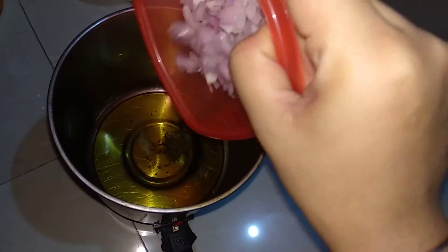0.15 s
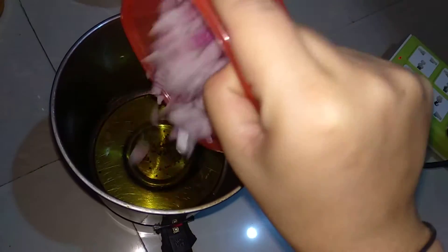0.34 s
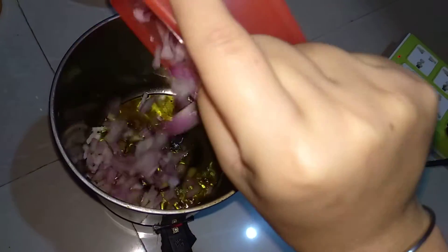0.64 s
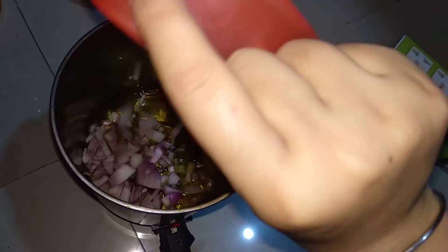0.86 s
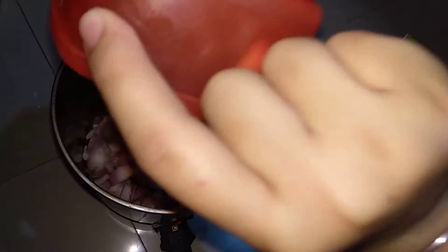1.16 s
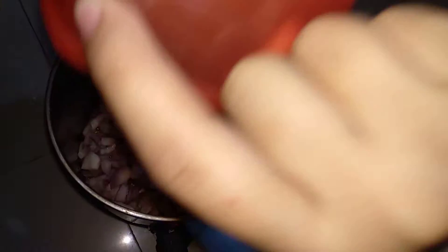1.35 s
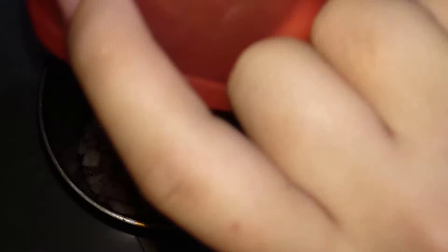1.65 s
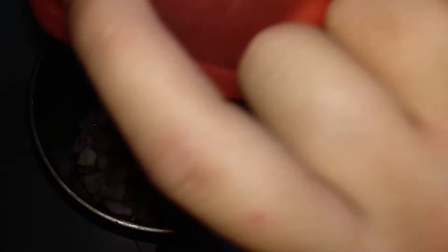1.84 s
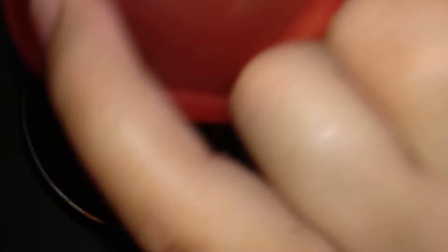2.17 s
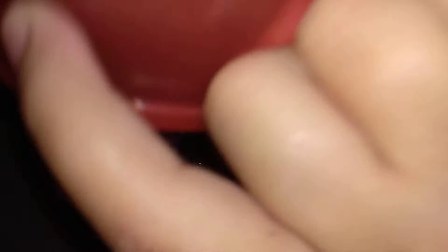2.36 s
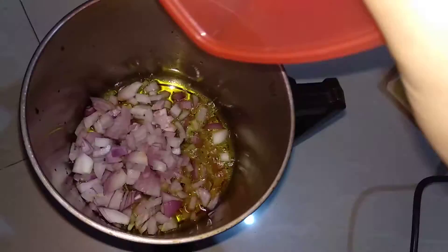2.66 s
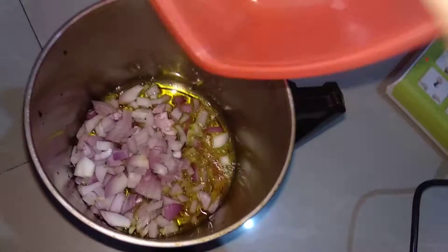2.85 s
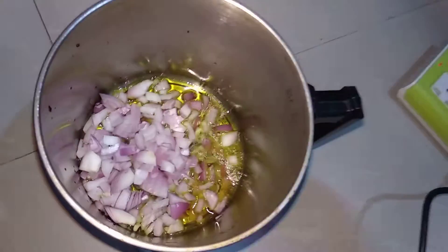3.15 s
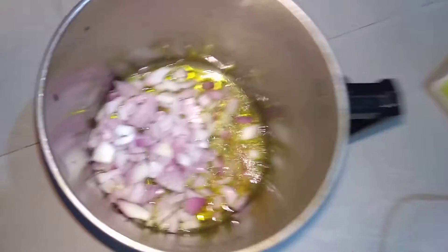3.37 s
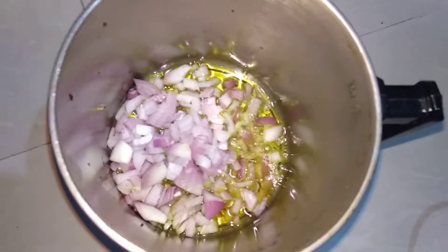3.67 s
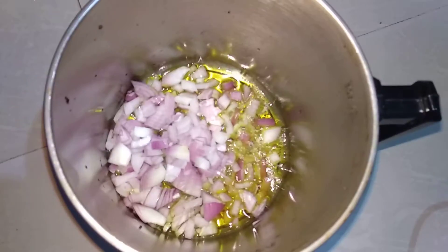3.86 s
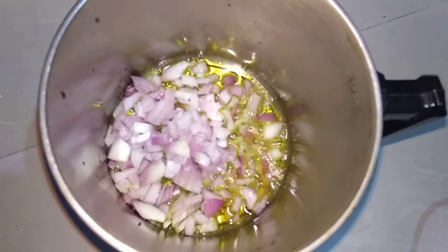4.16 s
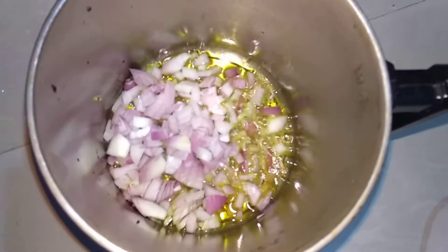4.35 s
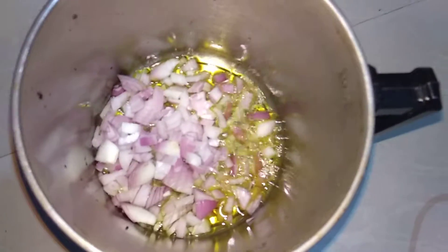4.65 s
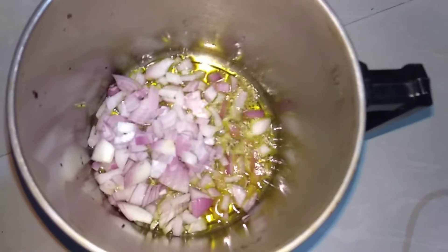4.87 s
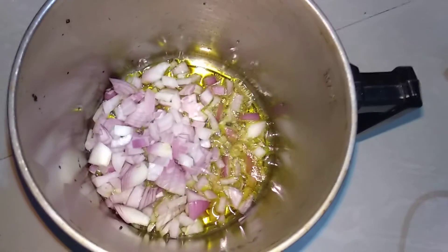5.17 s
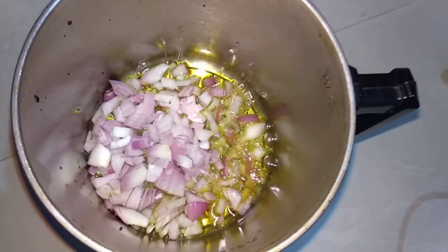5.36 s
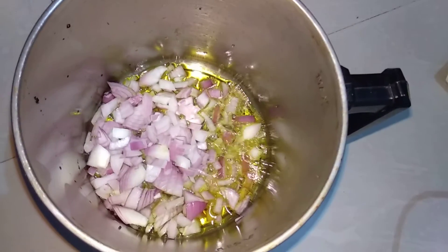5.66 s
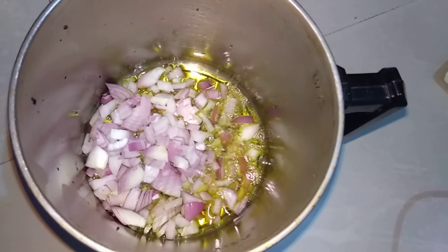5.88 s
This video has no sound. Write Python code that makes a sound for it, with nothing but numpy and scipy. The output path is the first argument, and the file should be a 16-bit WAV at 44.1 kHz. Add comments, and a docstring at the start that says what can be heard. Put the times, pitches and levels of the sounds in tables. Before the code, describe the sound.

Chopped onions patter into hot oil in a steel pot, sizzling up in a surge, then frying steadily with crackles and one sharp pop.

```python
"""Onions into hot oil

Chopped onions slide from a plastic bowl into hot oil in a steel pot, close to a hand-held camera.
They patter, spit in a surge and sizzle steadily (random grains); water drops burst (short resonances).
The bowl is tapped and put down (struck modes); pot air modes and kitchen echoes answer.
Beneath lie a low rumble and a drone (shaped noise) and, later, a faint hum (a wavering sine)."""
import sys
import numpy as np
from scipy import signal
from scipy.fft import rfft, irfft, next_fast_len
from scipy.io import wavfile
from scipy.ndimage import map_coordinates

SR = 44100
rng = np.random.default_rng(int(sys.argv[2]) if len(sys.argv) > 2 else 0)


def wav_record(signal):
    """Record a signal, one row per channel, as 16-bit PCM in the file named by sys.argv[1]."""
    frames = np.transpose(np.atleast_2d(signal))
    bounded = np.clip(frames, -1, 1)
    # unit amplitude maps onto the largest positive 16-bit level
    quanta = np.round(bounded * 32767).astype(np.int16)
    wavfile.write(sys.argv[1], SR, quanta)


N = 265261
RING = SR // 3  # samples in one short sound with its echoes
HZ = np.fft.rfftfreq(RING, 1 / SR)
TOP_HZ = 15950  # band limit of the camera
STRIKE_LAG_S = 0.001  # from blow to camera


def amp(db):
    """Decibels to gain."""
    return 10 ** (np.asarray(db) / 20)


def unit(x):
    """x at rms 1."""
    return x / np.sqrt(np.mean(x ** 2) + 1e-20)


def along(points, hz):
    """(Hz, value) points read on a log frequency axis."""
    point_hz, value = np.transpose(points)
    return np.interp(np.log(hz + 1), np.log(point_hz + 1), value)


def filtered(x, response):
    """x times a response of frequency, zero-padded."""
    n = x.shape[-1]
    padded = next_fast_len(n + SR // 10)
    spectrum = rfft(x, padded) * response(np.fft.rfftfreq(padded, 1 / SR))
    return irfft(spectrum, padded)[..., :n]


def coloured(x, spectrum):
    """x shaped by a spectrum, at rms 1."""
    return unit(filtered(x, lambda hz: amp(along(spectrum, hz))))


def delay(seconds):
    """Response of a path that takes this long."""
    return np.exp(-2j * np.pi * HZ * seconds)


def resonances(modes, detune=1):
    """Summed causal band-pass response of (Hz, width Hz, dB) modes, pitches times detune."""
    total = 0
    for hz, width_hz, db in modes:
        damping = 1j * HZ * width_hz
        total = total + amp(db) * damping / ((hz * detune) ** 2 - HZ * HZ + damping)
    return total


def struck(response):
    """Spectrum of a ring of peak 1, delayed by STRIKE_LAG_S and band-limited."""
    ring = response * delay(STRIKE_LAG_S) / (1 + (HZ / TOP_HZ) ** 20)
    return ring / np.abs(irfft(ring)).max()


def add(track, start_s, sound):
    """Mix a stereo sound in at start_s."""
    part = track[:, round(start_s * SR):][:, :sound.shape[1]]
    part += sound[:, :part.shape[1]]


def panned(level_db, left_right_db):
    """Left and right gains, the difference split evenly."""
    return amp(level_db + left_right_db * np.array([[.5], [-.5]]))


def swell(start_s, attack_s, hold_s, fade_s):
    """Gain that rises, holds until hold_s after the start and dies away."""
    t = np.arange(N) / SR - start_s
    return np.clip(t / attack_s, 0, 1) * np.exp(-np.maximum(t - hold_s, 0) / fade_s)


def wobble(knots_per_s):
    """Smooth random curve."""
    knots = rng.standard_normal(int(N * knots_per_s / SR) + 4)
    return map_coordinates(knots, [np.arange(N) * knots_per_s / SR])


def echoes(t60):
    """Response of a fresh diffuse tail of energy 1 per port, decaying 60 dB in t60 seconds."""
    t = np.arange(RING) / SR
    tail = rng.standard_normal((2, RING)) * amp(-60 * t / t60) * (t > .0004)
    return rfft(tail / np.linalg.norm(tail, axis=1, keepdims=True))


# pot air modes, in phase at both ports: pitch_hz, width_hz, level_db
UPRIGHT_MODES = [(562.7, 41.5, 21.5), (2490, 190, -1), (5850, 130, -20), (10500, 1100, -13.5)]
# air modes across the pot, opposite in sign at the ports: pitch_hz, width_hz, level_db
CROSS_MODES = [(1175, 60, -2), (1797, 153, 11), (4780, 190, 2)]
# left port faces away from the pot: freq_hz, left_right_db
LEFT_SHADE = [(400, -2), (1300, -9), (2400, -10), (4400, -3.5), (6500, -4), (8100, -4.5), (11000, -17),
              (15000, -11)]
MODE_SCATTER = 0.014  # relative sd of mode pitch between spots of the heap


def from_pot(ring, wall_db, room_db, wall_t60=0.031, room_t60=0.11):
    """A short sound leaves the pot: direct, off the steel wall, through the air modes, round the kitchen."""
    left_lag_s = 0.000254 + .00005 * rng.standard_normal()  # varies with the spot
    detune = 1 + MODE_SCATTER * rng.standard_normal()
    upright = resonances(UPRIGHT_MODES, detune)
    across = resonances(CROSS_MODES, detune)
    direct = np.array([delay(left_lag_s) - across, 1 + across])
    near = direct + upright + amp(wall_db) * echoes(wall_t60)
    far = amp(room_db) * echoes(room_t60) * (1 + upright + across)
    shade_db = np.outer([1, 0], along(LEFT_SHADE, HZ))
    # room sound comes from all sides: a tenth of the shading in dB
    return irfft(ring * (near * amp(shade_db) + far * amp(0.1 * shade_db)))


def grains(per_second, spread_db, flurry_db):
    """Impulses at random moments, loudness varying in short flurries: many weak, a few strong."""
    place, size, sign = rng.random((round(per_second * N / SR), 3)).T
    flurries = rng.standard_normal(N * 60 // SR)
    db = spread_db * np.minimum(-np.log(1 - size), 5)
    db = db + flurry_db * np.interp(place, np.linspace(0, 1, len(flurries)), flurries)
    return np.bincount((place * N).astype(int), amp(db) * np.sign(sign - .5), N)


def crackle(spectrum, pitches_hz, per_second, spread_db, flurry_db, room_db, wall_db, sharpness_q=2):
    """Grains from several spots in the pot, each with its own pitch, path and flurries; rms 1."""
    out = np.zeros((2, N))
    for hz in pitches_hz:
        ring = resonances([(hz, hz / sharpness_q, 0)])
        burst = amp(along(spectrum, HZ)) * ring * delay(STRIKE_LAG_S)
        path = from_pot(burst, wall_db, room_db)
        hits = grains(per_second / len(pitches_hz), spread_db, flurry_db)
        out += signal.oaconvolve(hits[None], path, axes=1)[:, :N]
    return unit(out)


# hand rumble, relative spectrum: freq_hz, level_db
RUMBLE_SPECTRUM = [(8, -49), (21, -13), (27, 3.5), (33, -14), (43, -5), (65, -23.5), (95, -30),
                   (300, -51.5)]
# room drone, relative spectrum: freq_hz, level_db
DRONE_SPECTRUM = [(25, -45), (50, 5.5), (70, 10), (92, -8), (112, 0.5), (150, -6), (200, -12.5), (262, -5),
                  (320, -18), (430, -13.5), (700, -22), (1200, -26.5), (4000, -43), (16000, -42)]
# drone level, interpolated: time_s, level_db
DRONE_COURSE = [(0.2, -60.5), (0.7, -65.5), (1.65, -66.5), (2.1, -60), (2.7, -62.5), (6.0, -63)]
# hand moves the camera: start_s, hold_s, level_db
HAND_MOVES = [(0.093, 0.073, -58.5), (3.105, 0.98, -56.5), (3.374, 0.33, -57.5), (4.85, 0.46, -58)]
MOVE_ATTACK_S, MOVE_FADE_S = 0.14, 0.13
HOLD_DB, TREMOR_DB = -65.5, -0.5  # rumble of the still hand; gain on its random wobble


def background():
    """The hand rumbles on the camera, more when it moves; the kitchen drones, near mono in the bass."""
    tremor = wobble(6)
    moving = sum(amp(db) * swell(start_s, MOVE_ATTACK_S, hold_s, MOVE_FADE_S)
                 for start_s, hold_s, db in HAND_MOVES)
    hand = np.hypot(amp(HOLD_DB + TREMOR_DB * tremor), moving)
    rumble = coloured(rng.standard_normal(N), RUMBLE_SPECTRUM)
    apart = [(50, -16.0), (130, -16), (280, -10.5), (600, -4.5), (1200, 5.0)]  # freq_hz, side_mid_db
    side = filtered(rng.standard_normal(N), lambda hz: amp(along(apart, hz)))
    mid = rng.standard_normal(N)
    drone = coloured(mid + np.array([side, -side]), DRONE_SPECTRUM)
    drone_db = np.interp(np.arange(N) / SR, *np.transpose(DRONE_COURSE))
    return hand * rumble + amp(drone_db) * drone


# onion loads sliding onto the pot's bottom: start_s, hold_s, patter_db
ONION_LOADS = [(0.342, 0.036, -65.5), (0.447, 0.15, -64.5), (0.83, 0.032, -65.5), (1.056, 0.11, -68.5)]
LOAD_ATTACK_S, LOAD_FADE_S = 0.026, 0.036
FIRST_PIECE_S, LANDING_S = 0.28, 0.473  # first piece touches the oil; the heap follows
SURGE_ATTACK_S = 0.016  # wet surfaces flash to steam at once
LAST_HOLD_S, LAST_FADE_S = 0.12, 0.41  # last load spits anew
FITS_DB, FLUTTER_DB = 3, 1.5  # gains on random wobble: surges, steady frying


def frying(oil_db, first_db, surge_db, hold_s, fade_s, last_db, steady_db, growth_db_per_s):
    """Steam strength: surface water boils off in a fitful surge, then frying steadily grows as it heats."""
    t = np.arange(N) / SR
    fits = wobble(22)
    first = amp(first_db) * np.clip((t - FIRST_PIECE_S) / 0.11, 0, 1)
    surge = amp(surge_db + FITS_DB * fits) * swell(LANDING_S, SURGE_ATTACK_S, hold_s, fade_s)
    last_swell = swell(ONION_LOADS[-1][0], LOAD_ATTACK_S, LAST_HOLD_S, LAST_FADE_S)
    last = amp(last_db + FITS_DB * fits) * last_swell
    rising_db = steady_db + growth_db_per_s * (t - LANDING_S)
    steady = amp(rising_db + FLUTTER_DB * fits) * (t > LANDING_S)
    return np.sqrt(amp(oil_db) ** 2 + first ** 2 + surge ** 2 + last ** 2 + steady ** 2)


# fine steam fizz, relative spectrum: freq_hz, level_db
FIZZ_SPECTRUM = [(300, -25), (1500, -45), (4200, -16), (5300, -4.5), (7000, -5.5), (9000, 0), (10500, 2),
                 (13000, -2.5), (15500, -4.5), (16500, -19)]
# coarser spatter, relative spectrum: freq_hz, level_db
SPATTER_SPECTRUM = [(200, -49), (600, 0.5), (1300, -9), (2400, -1.5), (3800, -0.5), (5500, -5.5),
                    (9000, -23), (16000, -59)]
# fizz strength: oil_db, first_db, surge_db, hold_s, fade_s, last_db, steady_db, growth_db_per_s
FIZZ_STEAM = dict(oil_db=-79, first_db=-67.5, surge_db=-49, hold_s=0.21, fade_s=0.17, last_db=-66, steady_db=-57.5, growth_db_per_s=0.78)
# spatter strength: oil_db, first_db, surge_db, hold_s, fade_s, last_db, steady_db, growth_db_per_s
SPATTER_STEAM = dict(oil_db=-104, first_db=-75.5, surge_db=-60, hold_s=0.18, fade_s=0.25, last_db=-64, steady_db=-71.5, growth_db_per_s=1.49)


def sizzle():
    """Steam escapes in many tiny bursts: fine fizz over coarser spatter, stray ticks on top."""
    fine_hz = np.geomspace(5000, 14500, 8)
    coarse_hz = np.geomspace(900, 5500, 7)
    fizz = crackle(FIZZ_SPECTRUM, fine_hz, per_second=4200, spread_db=3.5, flurry_db=1.7,
                   room_db=-4, wall_db=1.5)
    spatter = crackle(SPATTER_SPECTRUM, coarse_hz, per_second=2200, spread_db=2.5, flurry_db=3.0,
                      room_db=1, wall_db=5.0)
    # surface bubbles face the camera: broad clicks, drier
    ticks = crackle(FIZZ_SPECTRUM, [5000, 9000, 13000], per_second=190, spread_db=2.6, flurry_db=1.2,
                    room_db=-14, wall_db=-10, sharpness_q=0.7)
    fine = frying(**FIZZ_STEAM) * (fizz + amp(-8.0) * ticks)
    return fine + frying(**SPATTER_STEAM) * spatter


# loudest bursting water drops: start_s, relative level_db, pitch_hz
WATER_POPS = [(0.116, -24, 10500), (0.3, -25, 13000), (0.459, -32, 11000), (0.4818, -35, 11100),
              (0.5086, -30, 11300), (0.5377, -27, 10300), (0.593, -36, 9200), (0.6349, -30, 10300),
              (0.7067, -36, 10500), (0.7205, -24.5, 6300), (0.7834, -33, 9900), (0.817, -38, 10500),
              (0.8494, -31, 11300), (0.9366, -30.5, 12100), (1.2329, -37, 8200), (1.247, -26, 10500),
              (1.3178, -38, 11100), (1.3522, -34, 11800), (1.4, -30, 13000), (1.4949, -49, 8850),
              (1.5147, -35, 9500), (1.524, -18, 8550), (1.6178, -31, 10500), (1.7326, -25, 9900),
              (1.742, -36, 10500), (1.7708, -27, 11100), (1.8124, -32, 13500), (1.9111, -29.5, 10300),
              (2.1361, -14.5, 15000), (2.2702, -29, 10500), (2.499, -33, 11200), (2.577, -33.5, 8650),
              (2.709, -27.5, 12000), (2.925, -35, 10700), (3.092, -22.5, 12800), (3.1519, -22, 12300),
              (3.5566, -28.5, 9050), (3.7946, -26, 9900), (3.916, -30, 11200), (4.151, -25, 9000),
              (4.156, -3.5, 9270), (4.2624, -31, 9800), (4.295, -31.5, 10700), (4.4957, -31.5, 5700),
              (4.544, -36, 10500), (4.7004, -17.5, 10000), (5.0267, -17, 10260), (5.0929, -25, 10400),
              (5.162, -23.5, 9500), (5.232, -24.5, 10900), (5.358, -31.5, 9900), (5.4506, -31, 11300),
              (5.5433, -32.5, 8350), (5.8982, -19.5, 9260)]
POP_Q, POP_Q_PER_S = 1.46, 0.99  # snaps ring longer as frying goes on


def pops():
    """A water drop flashes to steam: a dry snap of a few cycles, then pot and, faintly, room."""
    out = np.zeros((2, N))
    for start_s, db, hz in WATER_POPS:
        sharpness_q = POP_Q + POP_Q_PER_S * start_s
        snap = struck(resonances([(hz, hz / sharpness_q, 0)]))
        heard = from_pot(snap, wall_db=-3, room_db=-10.5, wall_t60=0.011, room_t60=0.15)
        add(out, start_s, amp(db + 0.5) * heard)
    return out


# dull taps on the held bowl: start_s, level_db, pitch_hz, sharpness_q, click_db, left_right_db
BOWL_TAPS = [(0.147, -44, 875, 5.2, -22, -8), (0.1627, -45, 940, 2.6, -7, -9),
             (0.1775, -62, 950, 3.5, -12, 1), (0.2221, -49.5, 830, 2.3, -11, -13.5)]
TAP_CLICK_HZ, TAP_CLICK_WIDTH_HZ = 2360, 440


def taps():
    """The hand damps the bowl: each tap is a few dull cycles and a small click, with a room tail."""
    out = np.zeros((2, N))
    for start_s, db, hz, sharpness_q, click_db, left_right_db in BOWL_TAPS:
        body = resonances([(hz, hz / sharpness_q, 0)]) / (1 + .5j * HZ / hz) ** 2
        click = resonances([(TAP_CLICK_HZ, TAP_CLICK_WIDTH_HZ, 0)]) ** 2
        tap = struck(body + amp(click_db) * click)
        heard = irfft(tap * (1 + amp(-5) * echoes(t60=0.14)))
        add(out, start_s - STRIKE_LAG_S, panned(db, left_right_db) * heard)
    return out


# onion patter, relative spectrum: freq_hz, level_db
PATTER_SPECTRUM = [(120, -13), (400, 7), (560, -12.5), (720, -22), (1250, 4.5), (1700, -33), (6000, -49)]


def tumble():
    """Soft pieces patter onto the bottom as the bowl is tipped, sounding the pot's lowest air mode."""
    flow = sum(amp(db) * swell(start_s, LOAD_ATTACK_S, hold_s, LOAD_FADE_S)
               for start_s, hold_s, db in ONION_LOADS)
    return flow * crackle(PATTER_SPECTRUM, [560, 580, 1200], per_second=540, spread_db=5.0, flurry_db=1,
                          room_db=-1.5, wall_db=-4)


# wet clumps, big bubbles, small ticks: start_s, level_db, pitch_hz, sharpness_q
WET_PLOPS = [(0.473, -52.5, 2184, 47), (0.6066, -38.5, 5330, 7.9), (0.676, -44, 4100, 5),
             (0.707, -29, 2370, 8.9), (0.877, -60, 1910, 8), (0.972, -56.5, 2550, 9),
             (1.018, -54.5, 1910, 4.3), (1.248, -55, 2450, 14), (1.2504, -44, 4750, 7.2),
             (1.813, -44, 3500, 0.34), (2.315, -45.5, 4000, 1.4), (2.431, -52, 4300, 3),
             (2.675, -52, 4340, 6.1), (2.8733, -34, 2170, 0.64), (3.0103, -46, 3000, 1),
             (3.101, -46.5, 2360, 2), (3.7943, -39.5, 2400, 1), (3.9638, -46, 3000, 5.6),
             (4.244, -43, 2740, 1.8), (4.262, -41, 3900, 3.3)]


def plops():
    """Wet clumps and big bubbles ring at mostly lower pitches than the pops; dry ticks barely ring."""
    out = np.zeros((2, N))
    for start_s, db, hz, sharpness_q in WET_PLOPS:
        plop = struck(resonances([(hz, hz / sharpness_q, 0)]))
        add(out, start_s, amp(db) * from_pot(plop, wall_db=6, room_db=2.0))
    return out


# wet clumps hit the oil and spit: start_s, hold_s, level_db
CLUMP_SPUTTERS = [(0.486, 0.041, -48.5), (0.54, 0.02, -52), (0.591, 0.037, -48), (0.699, 0.04, -48),
                  (0.76, 0.024, -46), (0.804, 0.0078, -58), (0.875, 0.01, -53), (0.934, 0.013, -62),
                  (1.114, 0.042, -57.5), (1.188, 0.067, -53), (1.373, 0.022, -54.5)]
SPUTTER_ATTACK_S, SPUTTER_FADE_S = 0.0043, 0.02


def sputter():
    """Each wet clump spits a short, dry cluster of crackles, with coarser splatters beneath."""
    spitting = sum(amp(db) * swell(start_s, SPUTTER_ATTACK_S, hold_s, SPUTTER_FADE_S)
                   for start_s, hold_s, db in CLUMP_SPUTTERS)
    spits = crackle(FIZZ_SPECTRUM, [5500, 8500, 10500, 13000], per_second=800, spread_db=2.6,
                    flurry_db=2.2, room_db=-8, wall_db=-3, sharpness_q=1)
    splatters = crackle(SPATTER_SPECTRUM, [2400, 3600, 5000], per_second=450, spread_db=2,
                        flurry_db=1.5, room_db=-8, wall_db=-2)
    return spitting * (spits + amp(-11.5) * splatters)


# single onion pieces drop into the pot: start_s, level_db, pitch_hz, sharpness_q
ONION_PIECES = [(0.487, -62.5, 545, 1.8), (0.512, -58.5, 554, 1.4), (0.556, -63, 566, 1.3),
                (0.603, -66, 525, 1.3), (0.7075, -53.5, 810, 1.3), (0.841, -59, 1190, 4),
                (0.872, -65.5, 560, 1.8), (1.0705, -46.5, 1205, 15), (1.119, -53, 1260, 9),
                (1.136, -65, 555, 1), (1.184, -52, 1190, 7.8), (1.345, -59, 1140, 13),
                (1.385, -62, 1130, 9.6)]


def pieces():
    """Soft pieces land one by one: a short plock each, low-passed, coloured by the pot."""
    out = np.zeros((2, N))
    for start_s, db, hz, sharpness_q in ONION_PIECES:
        plock = struck(resonances([(hz, hz / sharpness_q, 0)]) / (1 + 1j * HZ / hz))
        add(out, start_s, amp(db) * from_pot(plock, wall_db=-4, room_db=-4))
    return out


HUM_START_S, HUM_ATTACK_S, HUM_HZ, HUM_DB = 3.03, 0.27, 109.2, -73
HUM_DRIFT, HUM_WAVER_DB = 0.0387, 5  # gains on random wobble: share of pitch, level


def hum():
    """A faint low sine comes in, wavering in pitch and level."""
    pitch_hz = HUM_HZ * (1 + HUM_DRIFT * wobble(15))
    phase = 2 * np.pi * np.cumsum(pitch_hz) / SR
    rise = np.clip((np.arange(N) / SR - HUM_START_S) / HUM_ATTACK_S, 0, 1)
    return amp(HUM_DB + HUM_WAVER_DB * wobble(6.3)) * rise * unit(np.sin(phase))


# bowl put down: start_s, level_db, brightness_limit_hz, left_right_db, ring_db, first_bounce_s
BOWL_KNOCKS = [(3.7045, -32, 4480, 4, -1, 0.00113), (3.8803, -30, 4940, 3.5, 0, 0.0016)]
# bowl wall modes: pitch_hz, width_hz, level_db
BOWL_MODES = [(398, 48, 6.5), (485, 83, 2.5), (782, 96, 4), (1150, 110, -6), (1310, 110, -3), (1408, 27, 7),
              (1720, 110, 2), (2650, 240, 0.5), (4020, 500, -8), (6400, 1000, 1)]
CLACK_HZ, CLACK_WIDTH_HZ, CLACK_DB = 1000, 1500, -8.5  # broad, dead contact
RIM_SHRINK, RIM_LOSS_DB = 0.712, 2  # per rim bounce: flight time ratio, contact loss


def bowl():
    """The empty bowl is put down in two clacks: rim chatters, walls ring briefly, room answers."""
    out = np.zeros((2, N))
    for start_s, db, limit_hz, left_right_db, ring_db, bounce_s in BOWL_KNOCKS:
        chatter = 0
        for k in range(5):
            contact_s = bounce_s * sum(RIM_SHRINK ** np.arange(k))
            chatter = chatter + amp(-RIM_LOSS_DB * k) * delay(contact_s)
        clack = resonances([(CLACK_HZ, CLACK_WIDTH_HZ, CLACK_DB)])
        body = amp(ring_db) * resonances(BOWL_MODES) + clack
        knock = struck(body / (1 + 1.4j * HZ / limit_hz - (HZ / limit_hz) ** 2) ** 2)
        room = amp(1.5) * echoes(t60=0.036) + amp(3.5) * echoes(t60=0.19)
        heard = irfft(knock * (chatter + room))
        add(out, start_s - STRIKE_LAG_S, panned(db, left_right_db) * heard)
    return out


def scene():
    """Everything at the two ports."""
    frying_sounds = sizzle() + sputter() + pops() + plops()
    onion_and_bowl = tumble() + pieces() + taps() + bowl()
    return frying_sounds + onion_and_bowl + background() + hum()


def record(dry):
    """Steep low-pass at the camera's band limit."""
    return filtered(dry, lambda hz: 1 / (1 + (hz / TOP_HZ) ** 120))


dry = scene()
out = record(dry)
wav_record(out)
```